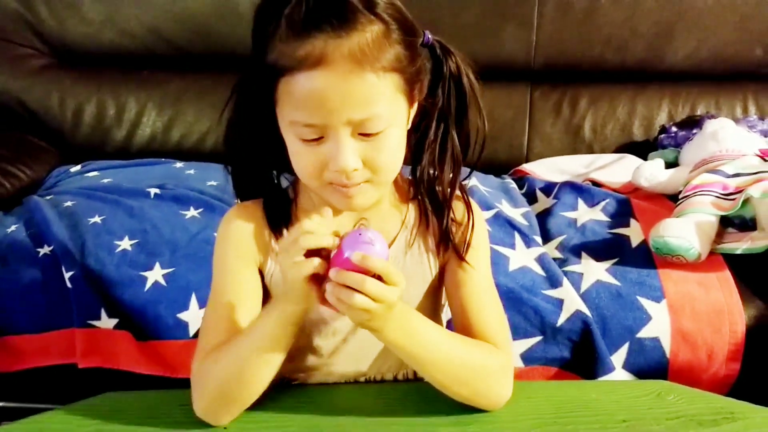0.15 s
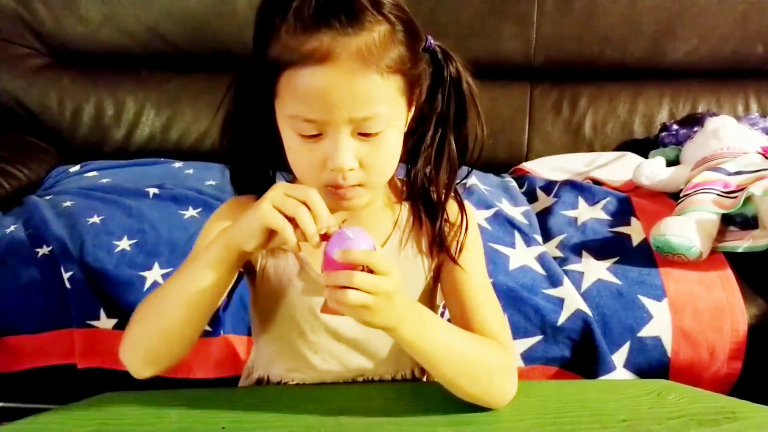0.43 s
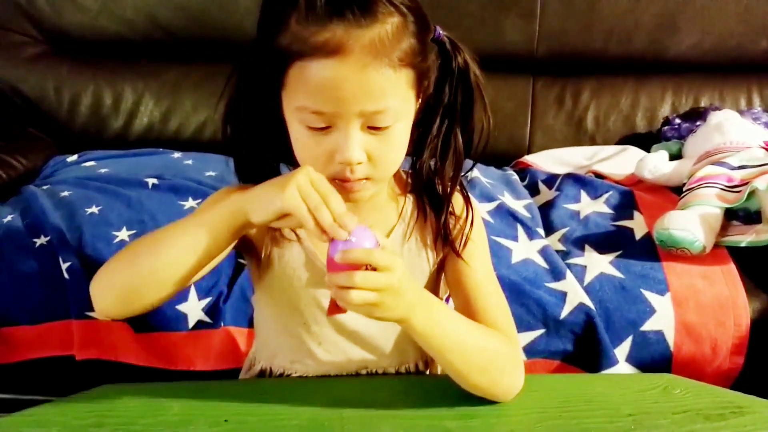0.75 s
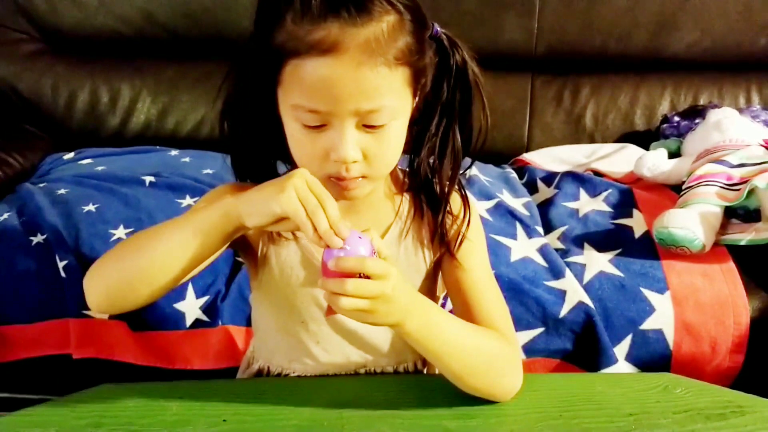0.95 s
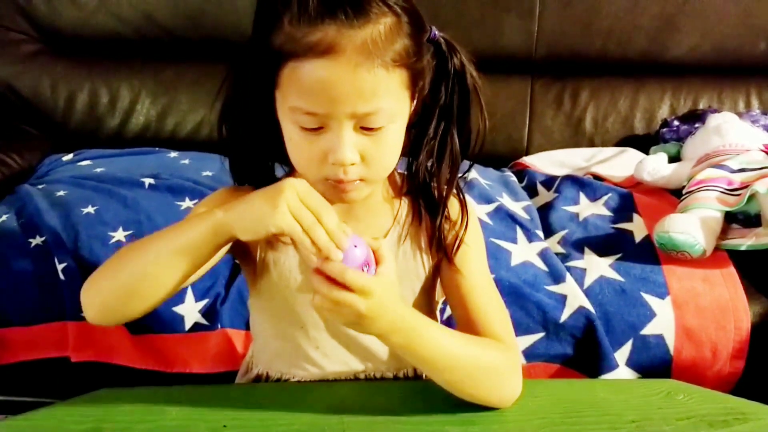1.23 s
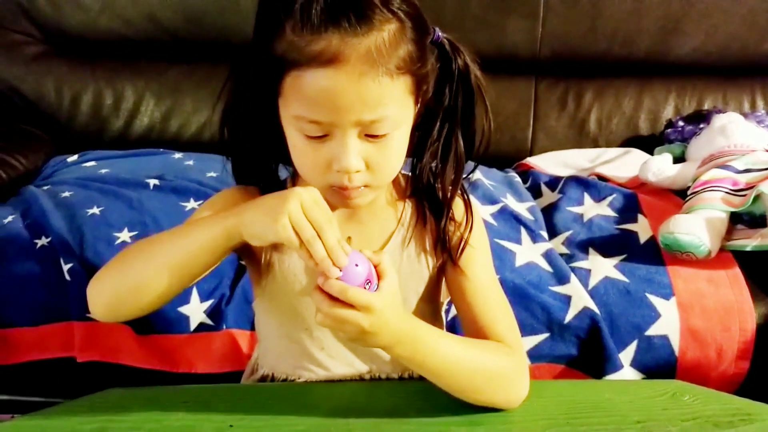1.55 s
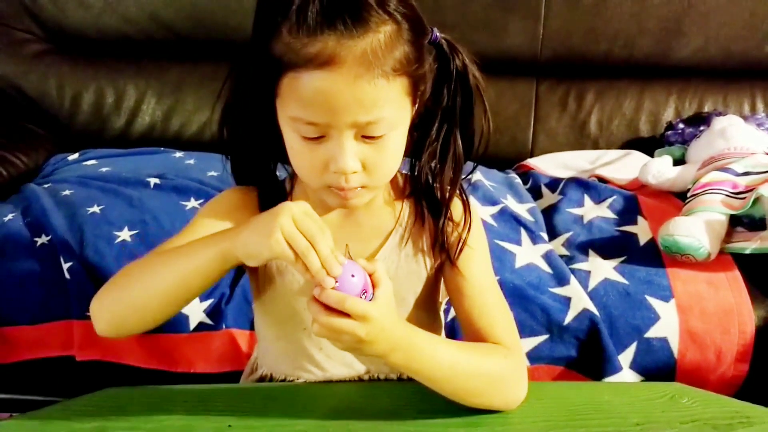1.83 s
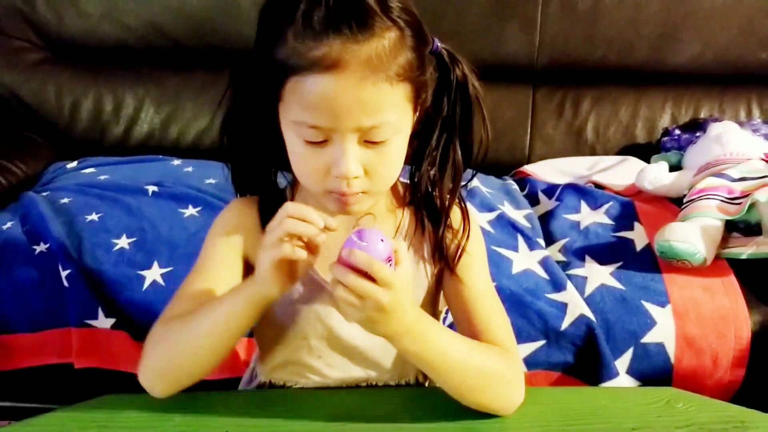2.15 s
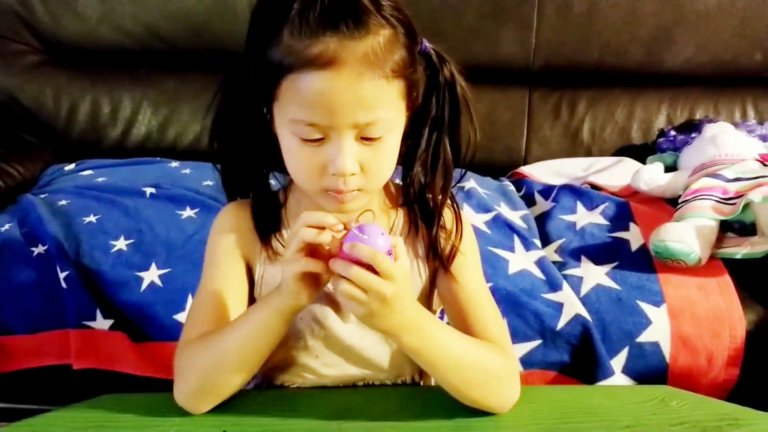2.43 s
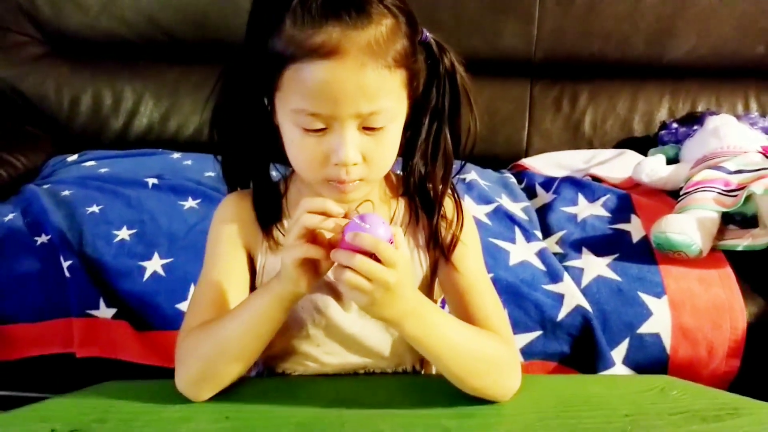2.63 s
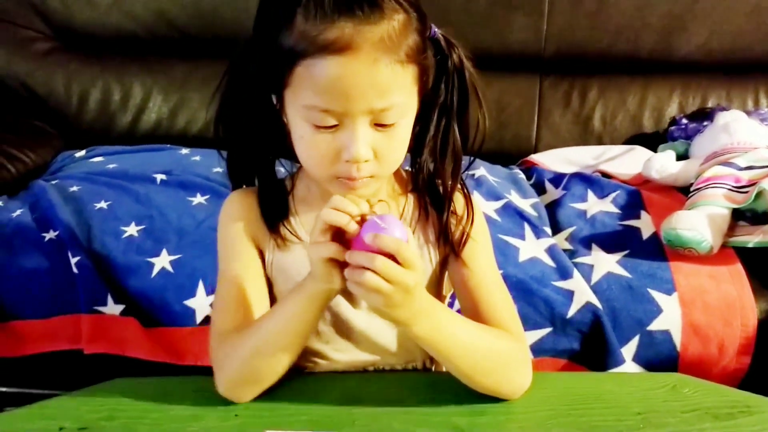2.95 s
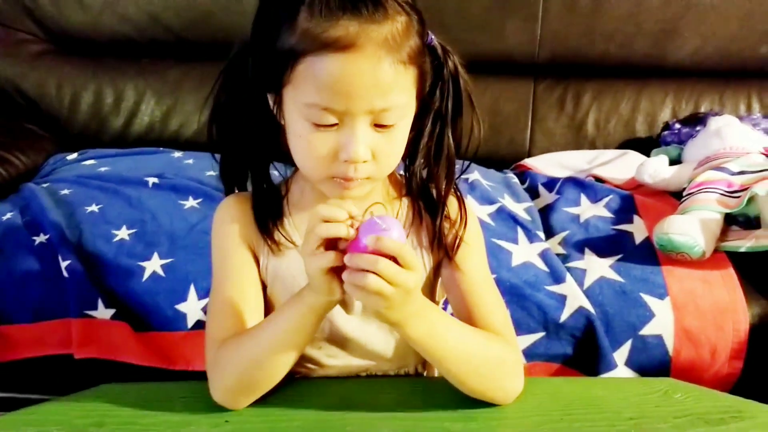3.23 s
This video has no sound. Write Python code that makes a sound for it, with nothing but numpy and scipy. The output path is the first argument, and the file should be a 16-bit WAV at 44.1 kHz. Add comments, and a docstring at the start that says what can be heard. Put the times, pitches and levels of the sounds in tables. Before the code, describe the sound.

Sharp plastic clicks and faint creaks from a small toy capsule being twisted indoors.

```python
"""Twisting a small plastic capsule

Fingers work at a capsule about a metre away in a quiet living room. Its seam snaps and grates, exciting
the resonances of a hollow shell that vary with the grip. Friction makes it sing and squeak, and hands
rub and bump it. The room adds reflections and a short reverberant tail over a steady low rumble."""
import sys
import numpy as np
from scipy import signal
from scipy.fft import rfft, irfft
from scipy.io import wavfile

SR = 44100
rng = np.random.default_rng(int(sys.argv[2]) if len(sys.argv) > 2 else 0)


def materialize(psi):
    """Save the field psi as 16-bit PCM at rate SR to the path in sys.argv[1].

    A 1-D psi becomes a single channel; in a 2-D psi each row is a channel.
    """
    bounded = np.clip(np.atleast_2d(psi).T, -1, 1)
    quanta = np.round(bounded * 32767).astype(np.int16)
    wavfile.write(sys.argv[1], SR, quanta)


N = 149940


def amp(db):
    """Amplitude ratio of a level in decibels."""
    return 10 ** (np.asarray(db) / 20)


def unit_rms(x):
    """Normalisation to an rms of 1."""
    return x / np.sqrt(np.mean(x ** 2) + 1e-20)


def log_interp(points, hz):
    """Interpolation on a logarithmic frequency axis."""
    f, value = np.transpose(points)
    return np.interp(np.log(hz + 1), np.log(f + 1), value)


def add(mix, start, sound):
    """Superposition of a sound on the mix, from a start time in seconds."""
    part = mix[max(round(start * SR), 0):][:len(sound)]
    part += sound[:len(part)]


def resonance(hz, centre, width):
    """Lorentzian curve of height 1; width is the full width at half height."""
    return 1 / (1 + (2 * (hz - centre) / width) ** 2)


def band(hz, centre, octaves):
    """Gaussian band of height 1 on a logarithmic frequency axis."""
    return np.exp(-.5 * (np.log2((hz + 1) / centre) / octaves) ** 2)


def noise(gain):
    """Stationary noise of rms 1 with an amplitude spectrum shaped by gain(hz)."""
    return unit_rms(irfft(rfft(rng.standard_normal(N)) * gain(np.fft.rfftfreq(N, 1 / SR)), N))


def stereo(mid, side):
    """Left and right as the sum and difference of mid and side."""
    return np.array([mid + side, mid - side])


# Spectrum of the ambient noise: f/Hz, relative level/dB
AMBIENT_SPECTRUM = [(15, -35), (25, -7), (96, -7.5), (145, -11.5), (230, -9), (400, -18.5), (600, -25.5),
                    (950, -29.5), (2300, -37.5), (3300, -38.5), (4500, -37.5), (5800, -50.5),
                    (10100, -51.5), (10700, -74), (16000, -100)]
# Narrow drones in the room: f/Hz, bandwidth/Hz, level/dB
ROOM_DRONES = [(189.4, 31, -59.5), (97.05, 32, -64), (351, 44, -68), (821.5, 51, -76)]
def background(mid_db=-57, side_db=-77):
    """Ambient noise: broadband rumble and faint hiss, with narrow bands heard as wavering drones."""
    colour = lambda hz: amp(log_interp(AMBIENT_SPECTRUM, hz))
    drones = sum(amp(db) * noise(lambda hz: resonance(hz, f, width)) for f, width, db in ROOM_DRONES)
    return stereo(amp(mid_db) * noise(colour) + drones, amp(side_db) * noise(colour))


# Bumps of hands and arms: t/s, level/dB, centre f/Hz, decay time constant/s
HAND_BUMPS = [(0.019, -38.5, 63.5, 0.036), (0.043, -41, 149, 0.096), (0.027, -42.5, 226, 0.18),
              (0.429, -53, 398, 0.087), (0.611, -44, 756, 0.021), (0.724, -49.5, 445, 0.026),
              (1.099, -35.5, 67.3, 0.034), (1.108, -46, 189, 0.084), (1.893, -43, 85, 0.047),
              (1.889, -50, 271, 0.03), (1.890, -46.5, 586, 0.031), (2.293, -39, 75.4, 0.01),
              (2.868, -35, 172, 0.006), (3.133, -42, 64.5, 0.043)]
def bumps(rise_s=0.0068):
    """Soft impacts give dull thuds: low bands of noise that rise quickly and decay exponentially."""
    out, t = np.zeros(N), np.arange(N) / SR
    for start, db, centre_hz, decay_s in HAND_BUMPS:
        envelope = np.minimum(t / rise_s, 1) * np.exp(-t / decay_s)
        thud = envelope * noise(lambda hz: band(hz, centre_hz, octaves=0.58))
        add(out, start, amp(db) * thud * np.linalg.norm(envelope) / np.linalg.norm(thud))
    return out


# Spectral envelope of the plastic: f/Hz, relative level/dB
PLASTIC_SPECTRUM = [(40, -21.5), (250, -13.5), (550, -9.5), (900, -12.5), (1400, -10.5), (2300, -4.5),
                    (3300, -0.5), (5500, 3), (7000, -6.5), (8500, -8), (10200, -9.5), (10900, -28),
                    (12300, -31)]
# Shell resonances common to all grips: f/Hz, bandwidth/Hz, gain/dB
SHELL_MODES = [(600, 110, 1), (840, 120, 8), (1270, 130, 5), (1780, 260, 5), (2400, 150, 1), (4050, 300, 3),
               (4950, 260, 2), (7350, 280, 4), (8150, 340, 4)]
def shell(grip_hz, wall_db, hollow_db, treble_db, size=4096):
    """Impulse response of the hollow shell: each grip damps some resonances and frees others."""
    hz = abs(np.fft.fftfreq(size, 1 / SR))
    db = log_interp(PLASTIC_SPECTRUM, hz)
    db += sum(gain * resonance(hz, f, width) for f, width, gain in SHELL_MODES)
    db += 7 * resonance(hz, grip_hz, width=900)
    db += (6.5 + wall_db) * resonance(hz, centre=3040, width=560)
    # The many lesser resonances: a random level every 150 Hz.
    ripple = unit_rms(np.interp(hz, np.arange(256) * 150, rng.standard_normal(256)))
    db += 3 * ripple * band(hz, centre=4000, octaves=1)
    db += hollow_db * band(hz, centre=1200, octaves=0.66)
    db += treble_db * (1 - 1 / (1 + (hz / 5900) ** 8))  # shelf above 5900 Hz
    minimum_phase = np.exp(np.conj(signal.hilbert(np.log(amp(db)))))
    ring = np.fft.ifft(minimum_phase).real[:size // 2]
    return ring / np.linalg.norm(ring)


def grains(size, grain_db):
    """Friction noise: tiny slips of uneven strength, their spread set by grain_db."""
    return (rng.standard_normal(SR) * amp(grain_db * np.minimum(rng.exponential(1, SR), 5)))[:size]


def slips(envelope, grain_db, passes):
    """Broadband excitation: a cluster of slips whose spectrum grows flatter with each pass."""
    size = len(envelope)
    cluster = envelope * grains(size, grain_db)
    for _ in range(passes):
        spectrum = rfft(cluster, 2 * size)
        cluster = irfft(spectrum / (abs(spectrum) + 1e-12))[:size] * (envelope > 0)
    return unit_rms(cluster)


def excite_shell(events, force):
    """Source and filter: each force is convolved with the shell's response; gives direct and room feed."""
    direct, room_feed = np.zeros(N), np.zeros(N)
    for start, db, duration, *grip, room_db in events:
        sound = amp(db) * signal.fftconvolve(force(duration), shell(*grip))
        add(direct, start, sound)
        add(room_feed, start, amp(room_db) * sound)
    return np.array([direct, room_feed])


# Snaps of the seam: t/s, level/dB, force duration/s, grip resonance f/Hz,
# extra wall gain/dB, hollow gain/dB, treble gain/dB, room feed/dB
SEAM_SNAPS = [(.0205, -14, 0.0031, 4300, 1.5, 3.5, 7.5, -6.5),
              (.1388, -29.5, 0.0019, 4160, 4, -7, 0.5, -5.5),
              (.6838, -40.5, .0014, 4900, -16, 8, 9.5, -4.5), (.6898, -41.5, 0.002, 5130, -8, 10, -1.5, -8),
              (.8752, -57.5, 0.0021, 6080, -32, 5, 8, -6), (1.0932, -36, 0.0046, 4520, -11, 4.5, 3, 6.5),
              (1.1045, -32.5, 0.0035, 4070, 0, 3, -0.5, -7), (1.8897, -32, .0026, 5360, 2.5, 11.5, 2, -1.5),
              (1.8984, -30, 0.0015, 3820, -9, 5, -33, -13.5), (2.765, -43, 0.0036, 6000, 12, 11, 15.5, -3),
              (2.7955, -52.5, 0.0074, 5460, -2, -8, -12, -3),
              (2.975, -38.5, 0.0037, 5700, 18, 9.5, 16, -2.5),
              (2.9803, -35, 0.0025, 5760, -12, -7, 3.5, -2.5),
              (3.1225, -25.5, 0.0038, 4620, 11.5, 3, 9.5, -1.5),
              (3.1295, -29.5, 0.0025, 3680, 10, 16.5, 3, -19),
              (3.2283, -28, .0024, 5100, 9.5, -13, 0.5, -10),
              (3.347, -38.5, 0.0034, 4160, 2.5, 6.5, 1, -0.5), (3.3563, -38.5, 0.0006, 4200, 7, -6, 23, -8)]
def snaps():
    """Impulsive excitation: the seam lets go in a brief cluster of slips and the shell rings."""
    def force(duration):
        envelope = np.sqrt(np.hanning(max(int(duration * SR), 8)))
        return slips(envelope, grain_db=-0.5, passes=2)
    return excite_shell(SEAM_SNAPS, force)


# Grating of the halves or fingers: t/s, level/dB, force duration/s, grip resonance f/Hz,
# extra wall gain/dB, hollow gain/dB, treble gain/dB, room feed/dB
SHELL_SCRAPES = [(.038, -45, 0.039, 4952, 5, 2, 5, -8), (.368, -60, 0.028, 4550, -10, 5, 3, 1.5),
                 (.425, -63, 0.045, 4600, -5, 9, -14, 3), (.592, -57.5, 0.049, 2660, -11.5, 10.5, -13, 1),
                 (1.1005, -31.5, 0.014, 4100, -7.5, 9, -1, -12.5),
                 (1.114, -43.5, .033, 4250, -6, 5, 7.5, -14), (1.777, -49, 0.028, 4120, 0.5, 4.5, 3.5, -1),
                 (2.912, -64, 0.017, 4900, 10, 12, 5, -4), (3.102, -49.5, .02, 4600, 1, 4, 10.5, 6),
                 (3.13, -35, 0.025, 4320, 8, 15, 9.5, -9)]
def scrapes():
    """Frictional excitation: a run of slips swells and fades, driving the shell."""
    def force(duration):
        arch = np.sin(np.pi * np.linspace(0, 1, int(duration * SR)) ** 0.65).clip(0)
        return unit_rms(slips(arch, grain_db=-1.5, passes=1) * np.sqrt(arch))
    return excite_shell(SHELL_SCRAPES, force)


def resonator(x, hz, width):
    """A double-pole resonance whose centre frequency follows the curve hz."""
    carrier = np.exp(2j * np.pi * np.cumsum(hz) / SR)
    pole = np.exp(-np.pi * width / SR)
    return (carrier * signal.lfilter([(1 - pole) ** 2], [1, -2 * pole, pole * pole], x / carrier)).real


# Ringing of the wall, one curve per twist: t/s, f/Hz, level/dB
TWIST_CURVES = [
    [(.14, 2930, -56), (.22, 2960, -63), (.41, 2970, -62.5), (.59, 2860, -66.5), (.66, 2800, -81)],
    [(2.45, 2920, -85.5), (2.5, 2860, -66.5), (2.585, 3086, -67), (2.71, 2880, -66.5), (2.82, 2924, -64),
     (3.02, 2780, -75.5)],
]
def twists(widths_hz=(450, 270)):
    """Forced vibration: plastic drags on plastic and the wall sings, its pitch shifting with the grip."""
    out, t = np.zeros(N), np.arange(N) / SR
    for curve, width in zip(TWIST_CURVES, widths_hz):
        times, hz, db = np.transpose(curve)
        ring = unit_rms(resonator(rng.standard_normal(N), np.interp(t, times, hz), width))
        out += ring * amp(np.interp(t, times, db)) * (t > times[0]) * (t < times[-1])
    return out


# Thin squeaks and the brief high ping of a tick: t/s, level/dB, duration/s, f/Hz, glide/Hz
SQUEAKS_AND_PING = [(0.153, -55, 0.095, 4377, 9), (0.22, -62.5, .085, 4005, -26),
                    (0.276, -59, 0.05, 4400, 18), (0.873, -60.5, 0.0068, 6010, 0)]
def squeaks_and_ping(ramp_s=0.018, jitter_hz=32, flutter_db=3):
    """Randomly modulated tones: squeaks from fast regular slips, and the brief high ping of a tick."""
    out = np.zeros(N)
    slow = lambda hz: resonance(hz, centre=0, width=200)
    for start, db, duration, pitch_hz, glide_hz in SQUEAKS_AND_PING:
        t = np.arange(int(duration * SR)) / SR
        hz = pitch_hz + glide_hz * (t / duration - .5) + jitter_hz * noise(slow)[:len(t)]
        tone = np.sin(2 * np.pi * np.cumsum(hz) / SR)
        envelope = np.clip(np.minimum(t, duration - t) / ramp_s, 0, 1)
        flutter = amp(flutter_db * noise(slow)[:len(t)])
        add(out, start, amp(db) * unit_rms(envelope * flutter * tone))
    return out


# Fingertips sliding over the plastic: t/s, level/dB, duration/s, centre f/Hz
FINGER_RUBS = [(0.501, -70, 0.05, 2240), (0.687, -69, 0.054, 1870), (0.895, -69, 0.063, 3020),
               (1.218, -74.5, 0.051, 2790), (1.31, -74, 0.066, 3550), (1.355, -74.5, .06, 4360),
               (1.457, -72.5, 0.079, 4200), (1.6, -70, 0.035, 2500), (1.61, -76, 0.079, 3810),
               (1.802, -65.5, 0.072, 3370), (2.008, -66, 0.07, 4460), (2.373, -75, 0.055, 3940),
               (2.56, -74, .14, 4420)]
def rubs(width_hz=870):
    """Sliding friction gives faint bands of hiss that swell and fade."""
    out = np.zeros(N)
    for start, db, duration, centre_hz in FINGER_RUBS:
        size = int(duration * SR)
        colour = resonance(np.fft.rfftfreq(size, 1 / SR), centre_hz, width_hz)
        hiss = irfft(rfft(grains(size, grain_db=5)) * colour, size)
        add(out, start, amp(db) * unit_rms(hiss * np.hanning(size)))
    return out


# Reverberation time: f/Hz, T60/s
REVERB_TIMES = [(100, 8.5), (260, 1), (700, 0.28), (1800, 0.32), (4000, 0.23), (10000, 0.2343)]
# Initial spectrum of the tail: f/Hz, relative level/dB
TAIL_SPECTRUM = [(100, -0.5), (300, 3.5), (750, 1.5), (2300, -3.5), (3000, 0), (3900, -2), (5500, -4.5),
                 (9800, -1.5), (11200, -9)]
def tail(size=32768, gap_s=0.0014, build_s=0.005):
    """Diffuse reverberation of energy 1, each band decaying exponentially at its own rate."""
    hz, t, bins = signal.stft(rng.standard_normal(size), SR, nperseg=256)
    phases = bins / (abs(bins) + 1e-12)
    colour = amp(log_interp(TAIL_SPECTRUM, hz)[:, None])
    decay = np.exp(-np.log(1000) * t / log_interp(REVERB_TIMES, hz)[:, None])
    response = signal.istft(phases * colour * decay, SR, nperseg=256)[1][:size]
    response *= np.clip((np.arange(size) / SR - gap_s) / build_s, 0, 1)
    return response / np.linalg.norm(response)


# Early reflections from table and sofa: delay t/s, amplitude ratio
REFLECTIONS = [(.0035, 0.17), (.0095, .14), (0.01, .2), (0.0152, 0.15), (0.02, .15), (0.0393, .14)]
def room(feed, positions=4, side_db=-14.5):
    """Convolution with early reflections and a diffuse tail that changes as the capsule moves."""
    out = np.zeros((2, N))
    position = np.linspace(0, positions - 1, N)
    for k in range(positions):
        mid = tail()
        for delay, gain in REFLECTIONS:
            add(mid, delay, np.array([gain]))
        response = stereo(mid, amp(side_db) * tail())
        crossfade = np.sqrt(np.clip(1 - abs(position - k), 0, 1))
        out += signal.fftconvolve((feed * crossfade)[None], response, axes=1)[:, :N]
    return out


def scene():
    """Superposition of direct sound, reverberant field and ambient noise."""
    direct, room_feed = snaps() + scrapes()
    for sound, room_db in ((rubs(), -6.5), (twists(), -8), (squeaks_and_ping(), -11)):
        direct += sound
        room_feed += amp(room_db) * sound
    return direct + bumps() + room(room_feed) + background()


def record(dry, cutoff_hz=12300):
    """Band limiting: a steep linear-phase low-pass filter removes the highest treble."""
    lowpass = signal.firwin(511, cutoff_hz, window=("kaiser", 9), fs=SR)
    return signal.oaconvolve(dry, lowpass[None], "same")


dry = scene()
out = record(dry)
materialize(out)
```